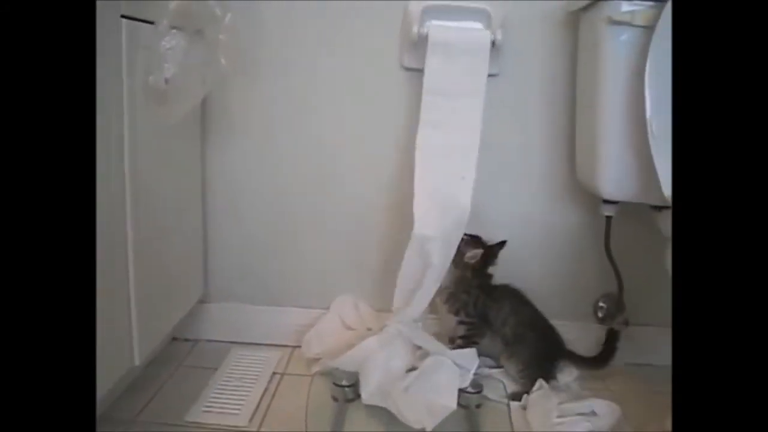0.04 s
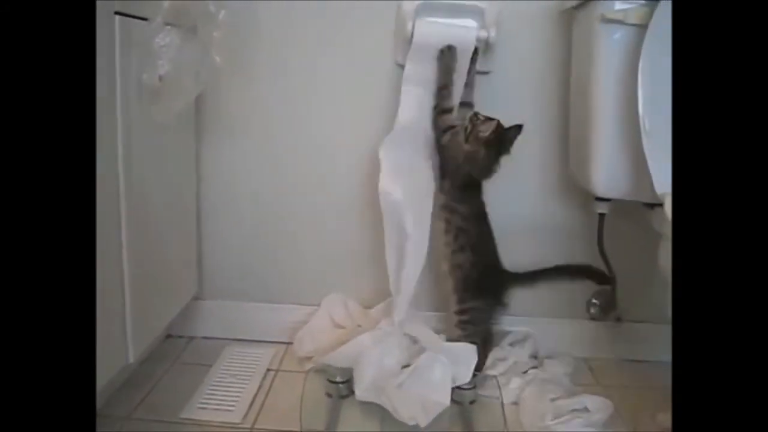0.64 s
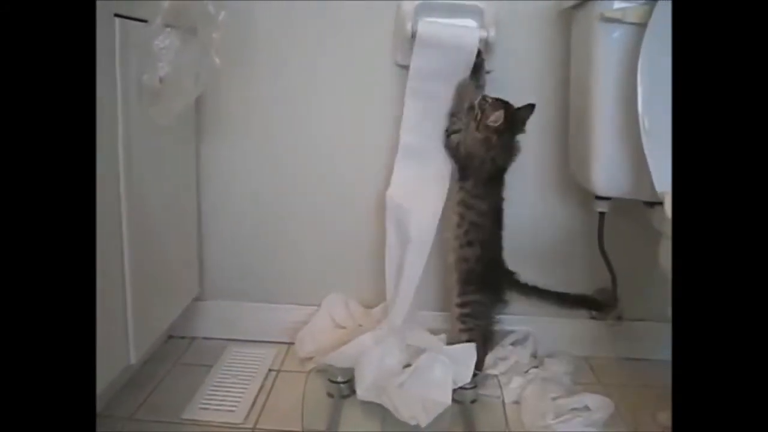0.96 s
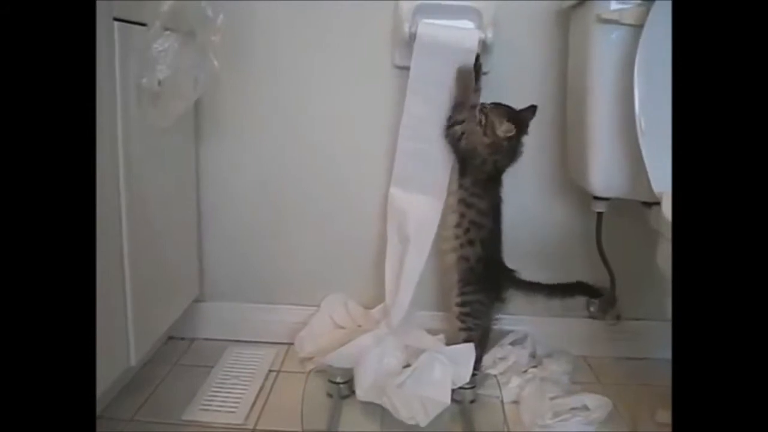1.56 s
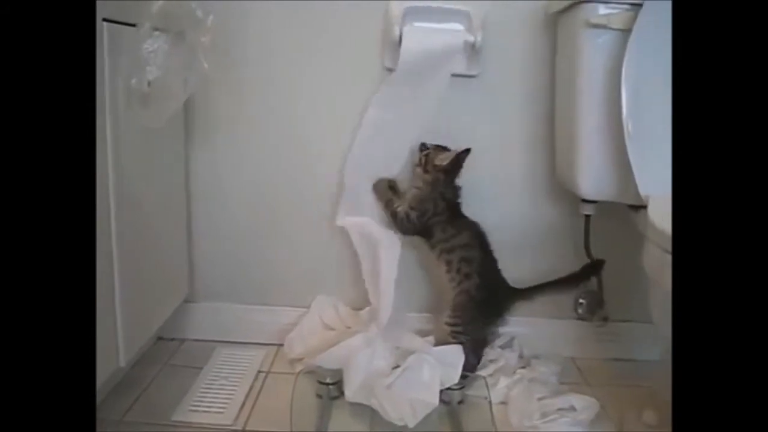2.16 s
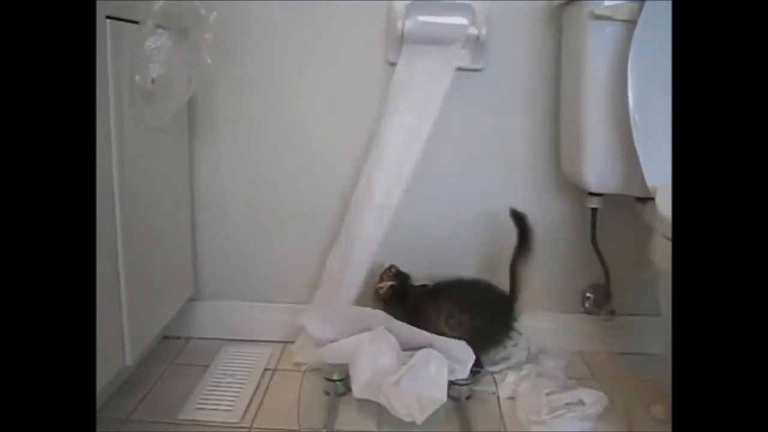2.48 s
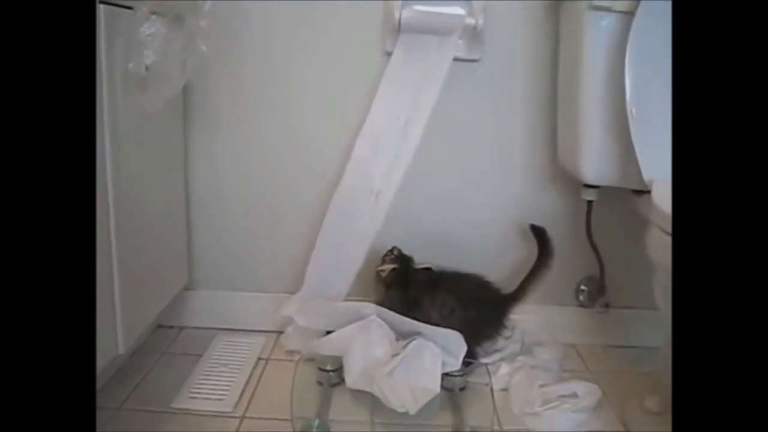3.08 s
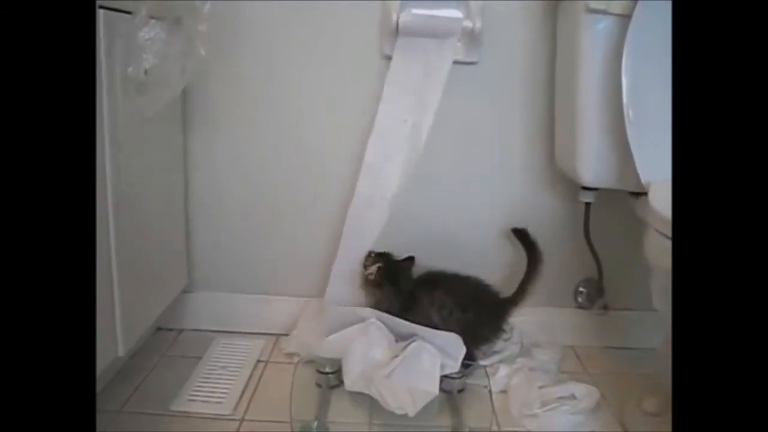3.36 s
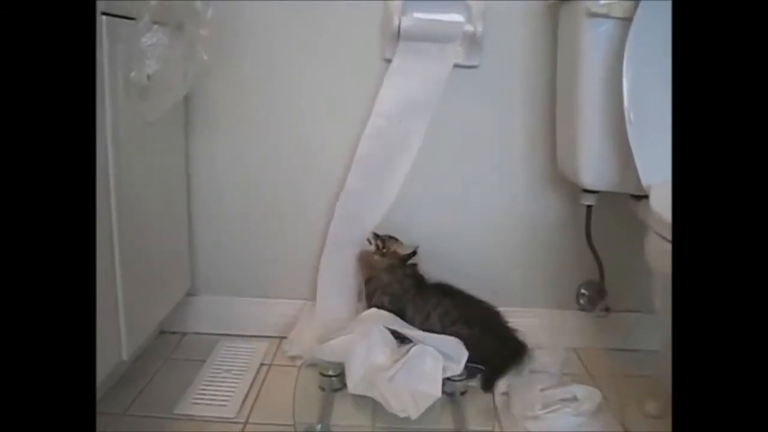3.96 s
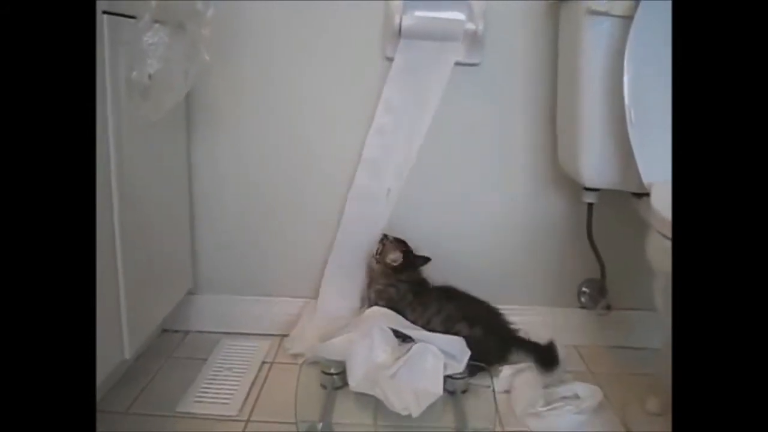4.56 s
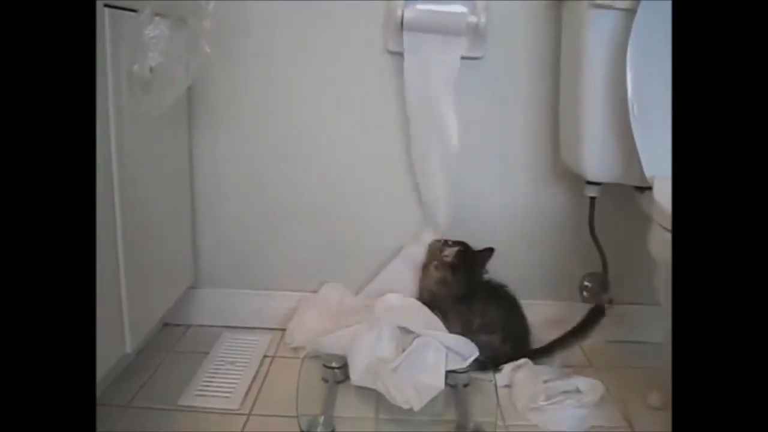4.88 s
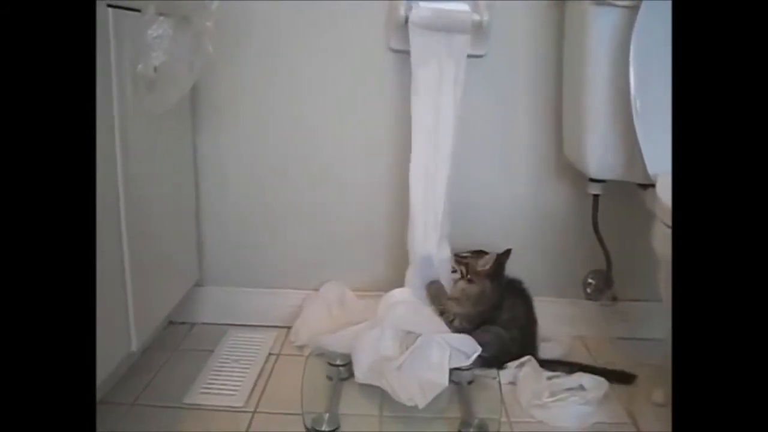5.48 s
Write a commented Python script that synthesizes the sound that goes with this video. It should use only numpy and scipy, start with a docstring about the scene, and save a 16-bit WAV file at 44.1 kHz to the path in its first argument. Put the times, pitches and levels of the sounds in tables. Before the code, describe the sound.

A light rustle of toilet paper is followed by a loud clatter of the spindle as a kitten claws the roll. Scattered ticks, knocks and papery swishes build to another rattling pull, with dull paw landings. The holder then mostly settles, leaving soft rustles and a closing run of sharp crinkles. Everything is heard from within a small, briefly echoing bathroom over faint ventilation noise.

```python
"""Tissue rustles and a spindle knocks and rattles: a kitten claws at a toilet roll, then tugs the strip.
Friction of the turning tube and impacts of the spindle excite the resonances of the holder.
The sliding tissue hisses as its fibres rub and crinkles as it buckles; soft paws thump in the heap
on the floor. A small tiled bathroom reverberates briefly, over faint ventilation and a thin whine."""
import sys
import numpy as np
from scipy import signal
from scipy.fft import rfft, irfft
from scipy.io import wavfile

SR = 44100
rng = np.random.default_rng(int(sys.argv[2]) if len(sys.argv) > 2 else 0)


def to_wav(sig):
    """Store sig (one row per channel, or 1-D mono) as 16-bit WAV at the path in sys.argv[1].

    Samples outside -1..1 are clipped; the rate is SR.
    """
    pcm = np.clip(np.atleast_2d(sig), -1, 1) * 32767
    pcm = np.round(pcm).astype(np.int16)
    wavfile.write(sys.argv[1], SR, pcm.T)  # frames by channels


N = 247842
TIME = np.arange(N) / SR


def undb(db):
    """Decibels to amplitude ratio."""
    return 10 ** (np.asarray(db) / 20)


def unit(x):
    """Normalise to rms 1."""
    return x / np.sqrt(np.mean(x ** 2))


def add(track, start_s, sound):
    """Superpose a sound on the track."""
    start = int(start_s * SR)
    track[start:start + len(sound)] += sound[:N - start]


def bins(size=8192):
    """Frequency grid of a response, in Hz."""
    return np.arange(size // 2 + 1) * SR / size


def on_log_axis(hz, rows):
    """Interpolate (frequency_hz, value) rows along log frequency."""
    points, values = np.transpose(rows)
    return np.interp(np.log(hz + 1), np.log(points), values)


def colour(rows):
    """Magnitude response from (frequency_hz, gain_db) rows."""
    return undb(on_log_axis(bins(), rows))


def hump(centre_hz, reach_octaves):
    """Band-pass magnitude response, symmetric in log frequency."""
    octaves = np.log2((bins() + 1) / centre_hz)
    return 1 / (1 + (octaves / reach_octaves) ** 2) ** 0.91


def ring(force, gain):
    """Forced vibration of a causal, minimum-phase body with this magnitude response."""
    cepstrum = irfft(np.log(gain + 1e-6))
    half = len(cepstrum) // 2
    cepstrum[1:half] *= 2
    cepstrum[half + 1:] = 0
    impulse_response = irfft(np.exp(rfft(cepstrum)))
    return signal.fftconvolve(force, impulse_response)[:len(force)]


def grains(per_s, spread_db):
    """Shot noise: impulses of random size at random moments, rms 1."""
    fires = rng.random(N) < per_s / SR
    impulses = fires * rng.standard_normal(N)
    return unit(impulses * undb(spread_db * np.clip(rng.standard_normal(N), -2, 2)))


def flutter(per_s):
    """Slow random modulation with a spread near 1."""
    step = max(int(SR / per_s), 1)
    return np.interp(np.arange(N) / step, np.arange(N), rng.standard_normal(N))


def chatter(length_s, size=8192):
    """Broadband contact force: a dense rattle that swells and stops, energy 1."""
    age = np.arange(size) / SR / length_s
    envelope = np.sqrt(age) * np.exp(-age ** 3)
    burst = rng.standard_normal(size) * envelope
    for _ in range(2):
        whitened = irfft(np.exp(1j * np.angle(rfft(burst))))
        burst = whitened * np.sqrt(envelope)
    return burst / np.sqrt(np.sum(burst ** 2))


def blow(length_s, gain):
    """Impact excitation: chatter rings a body, with the energy of rms 1 held for length_s."""
    sound = ring(chatter(length_s), gain)
    return sound * np.sqrt(length_s * SR / np.sum(sound ** 2))


def pulls(rows, attack_s, release_s, linger_db, fade_db_per_s):
    """Envelope of driven, then damped motion: pulls take hold, let go and linger; their powers add."""
    power = 0
    for start_s, length_s, level_db, swell_db in rows:
        age = TIME - start_s
        since_release = np.maximum(age - length_s, 0)
        attack = np.sin(np.pi / 2 * np.clip(age / attack_s, 0, 1)) ** 2
        hold = undb(level_db + swell_db * (np.clip(age / length_s, 0, 1) - .5))
        linger = undb(linger_db - fade_db_per_s * since_release)
        release = np.maximum(np.exp(-since_release / release_s), linger)
        power = power + (attack * hold * release) ** 2
    return np.sqrt(power)


def ventilation(level_db=-58):
    """Steady broadband air noise, filtered by two hollow duct resonances."""
    # spectrum of the air noise: frequency_hz, gain_db
    air_spectrum = [(25, -3), (70, -1), (130, -5.5), (180, -3), (245, -2.5), (310, 5.5), (400, -6.5),
                    (790, -6.5), (925, 6), (1080, -4.5), (1500, -11.5), (4000, -14.5), (9000, -19.5),
                    (16000, -27)]
    return undb(level_db) * unit(ring(rng.standard_normal(N), colour(air_spectrum)))


def whine(pitch_hz=7740, waver_hz=25, level_db=-80):
    """A thin background tone wavers by random frequency modulation."""
    hz = pitch_hz + waver_hz * flutter(40)
    return undb(level_db) * unit(np.sin(2 * np.pi * np.cumsum(hz) / SR))


def holder():
    """Modal response of the holder: overlapping resonances add in power."""
    # modes of holder, spindle and cardboard tube: pitch_hz, bandwidth_hz, gain_db
    modes = [(182, 66, -4), (550, 180, 5.5), (974, 390, -1), (1385, 116, 1), (1623, 120, -1.5),
             (1790, 100, -5), (2030, 130, -4.5), (2450, 520, -4.5), (3020, 140, -1), (3990, 430, 0),
             (4540, 190, -7), (4855, 95, 0.5), (5400, 100, -7), (5890, 470, -4), (10160, 2100, -7.5)]
    hz = bins()
    power = 0
    for pitch_hz, bandwidth_hz, gain_db in modes:
        resonance = 1 / (1 + (2 * (hz - pitch_hz) / bandwidth_hz) ** 2)
        bass_rolloff = hz / (hz + pitch_hz)
        power = power + undb(gain_db) ** 2 * resonance * bass_rolloff
    return np.sqrt(power)


def roll(bumps_per_s=5000, wobble_db=1):
    """Roughness excitation: the tube scrapes round the spindle, shakes the holder and coasts to rest."""
    # turns of the roll: start_s, length_s, level_db, swell_db
    turns = [(0, .09, -61.5, 4), (.511, 0.112, -30.5, -0.5), (1.295, 0.02, -55, -8),
             (1.688, 0.029, -33, -1), (2.0, 0.17, -49.5, -2), (2.14, 0.21, -46.5, -6),
             (2.288, 0.044, -39.5, -6), (2.345, 0.052, -29, 4), (2.40, 0.095, -37.5, 1),
             (4.615, 0.054, -52.5, 8), (4.85, 0.95, -55, 1), (5.187, 0.024, -41.5, -13)]
    # spectrum of the scraping: frequency_hz, gain_db
    scrape_spectrum = [(40, 3), (95, 0.5), (160, 6), (260, 0), (600, 0), (850, 1.5), (1600, 1), (2100, 3.5),
                       (3500, -4.5), (5500, -1.5), (9000, -6), (16000, -22)]
    bumps = grains(bumps_per_s, spread_db=2) * undb(wobble_db * flutter(110))
    turning = pulls(turns, attack_s=0.0076, release_s=0.0079, linger_db=-19.5, fade_db_per_s=62)
    return unit(ring(bumps, holder() * colour(scrape_spectrum))) * turning


def contact(centre_hz, reach_octaves):
    """Selective excitation: one contact favours the holder's modes near its centre frequency."""
    return holder() * hump(centre_hz, reach_octaves)


def grates(slips_per_s=3000):
    """Stick-slip friction of the spindle in its sockets keeps a few resonances ringing."""
    # spells of grating: start_s, length_s, level_db, centre_hz, reach_octaves
    spells = [(0.016, 0.072, -58.5, 1470, 0.28), (0.487, 0.015, -31, 4400, 1),
              (0.509, 0.14, -33, 5400, 0.25), (.51, 0.11, -32.5, 1950, 0.21),
              (1.37, 0.035, -47, 4000, 0.19), (1.689, 0.0295, -29.5, 1880, 0.28),
              (1.681, 0.043, -37, 3160, 0.018), (2.004, 0.11, -51, 1387, 0.03),
              (2.152, 0.31, -44, 1398, 0.028), (2.363, 0.057, -30, 1130, 0.3),
              (4.648, 0.34, -55.5, 1790, 0.084), (5.361, 0.24, -53, 3926, 0.012)]
    out = np.zeros(N)
    for start_s, length_s, level_db, centre_hz, reach_octaves in spells:
        size = int(length_s * SR)
        slips = grains(slips_per_s, spread_db=4.5)[:size]
        ringing = unit(ring(slips, contact(centre_hz, reach_octaves)))
        add(out, start_s, undb(level_db) * ringing * signal.windows.tukey(size))
    return out


def tissue(holder_db=3):
    """Mechanical coupling: the taut strip adds the holder's high ring to its own broad response."""
    # spectrum of the strip: frequency_hz, gain_db
    strip_spectrum = [(60, -17), (160, -11.5), (400, -3), (700, -3), (1200, 2), (2200, 0), (3000, 0.5),
                      (4500, -1), (7000, -4.5), (11000, -7.5), (15500, -14.5)]
    return colour(strip_spectrum) * np.hypot(1, undb(holder_db) * contact(4400, 0.14))


def paper(fibres_per_s=9000, folds_per_s=70, fold_db=-6, catch_db=3.5, brisk_db=-45, rest_db=-78):
    """Friction of fibres gives an uneven hiss; buckling folds merge into a swish on brisk pulls."""
    # strokes of the tissue under the claws and over itself: start_s, length_s, level_db, swell_db
    strokes = [(.228, 0.11, -50.5, 0.5), (.32, 0.16, -57, 3), (.60, 0.087, -38, 6.5),
               (.772, 0.036, -38, 10), (.815, 0.091, -33, 0.5), (1.27, 0.049, -51.5, 15),
               (1.40, 0.038, -49.5, 8), (1.558, 0.029, -40.5, 4.5), (1.75, 0.23, -63, 17),
               (1.948, 0.026, -46, 9), (2.18, 0.15, -43, -6.5), (2.29, 0.052, -39.5, 10),
               (2.33, 0.17, -28.5, -2), (2.67, 0.067, -54.5, -3), (3.288, 0.11, -47, 13),
               (3.42, 0.58, -56, -2), (4.12, 0.074, -53, 2), (4.2, 0.27, -61, -2), (4.592, 0.049, -43.5, 6),
               (4.66, 0.32, -49, 3), (5.0, 0.91, -52, 1), (5.16, 0.07, -38, 3.5), (5.29, 0.041, -43.5, -5),
               (5.53, 0.028, -40.5, -5)]
    # crispness, higher in crumpling than in sliding: time_s, treble_gain_db
    crispness = [(.55, 1), (.85, 1.5), (1.57, 2), (2.4, 0), (3.4, -2), (4.6, -2), (5.2, 3)]
    sliding = pulls(strokes, attack_s=0.0085, release_s=0.009, linger_db=-22, fade_db_per_s=40)
    sliding = np.hypot(sliding, undb(rest_db))  # the hanging strip is never quite still
    crowding = 1 + sliding / undb(brisk_db)
    rustle = grains(fibres_per_s, spread_db=1.5) * undb(catch_db * flutter(60))
    for fold_hz in (1300, 2600, 5200, 10400):  # four sizes of fold
        folds = grains(folds_per_s * crowding, spread_db=0.5) / np.sqrt(crowding)
        snap = blow(length_s=.004, gain=hump(fold_hz, reach_octaves=0.56))
        buckles = unit(signal.fftconvolve(folds, snap)[:N])
        band_weight = np.sqrt(fold_hz / 10000)  # higher folds fill wider bands
        rustle = rustle + undb(fold_db) * band_weight * buckles
    rustle = unit(ring(rustle, tissue()))
    treble = signal.sosfiltfilt(signal.butter(2, 8000, "high", fs=SR, output="sos"), rustle)
    treble_gain = undb(np.interp(TIME, *np.transpose(crispness)))
    return (rustle + (treble_gain - 1) * treble) * sliding


def near_wall(reflection=0.78):
    """Comb filtering: a wall echo interferes with the direct sound; its lag varies from spot to spot."""
    lag_s = rng.uniform(.0007, .0016)
    return np.abs(1 + reflection * np.exp(2j * np.pi * bins() * lag_s))


def knocks():
    """Impacts of the spindle ring the holder close to the wall; a harder contact rings higher."""
    # spindle impacts: start_s, level_db, centre_hz, reach_octaves, contact_s
    impacts = [(0.495, -28.5, 5200, 2.3, 0.0044), (0.5061, -15.5, 4270, 2.5, 0.0025),
               (0.5093, -12, 4500, 0.72, 0.0027), (0.5648, -25.5, 1820, 0.51, .004),
               (0.568, -20.5, 4600, 0.7, 0.0023), (0.976, -37, 3340, 0.63, 0.0047),
               (0.9784, -19.5, 5930, 0.52, 0.0044), (1.301, -43.5, 5200, 0.57, 0.0037),
               (1.309, -41.5, 4600, 0.28, .004), (1.399, -43, 4630, 0.59, 0.0056),
               (1.421, -38.5, 5030, 0.47, 0.0035), (1.436, -41, 5400, 0.65, 0.0042),
               (1.541, -41.5, 6060, 0.76, 0.0037), (1.562, -39.5, 7000, 0.95, 0.0045),
               (1.6727, -28.5, 5300, 1.1, 0.0038), (1.6764, -28.5, 7040, 2.2, 0.0055),
               (1.688, -30, 4500, 2.5, .003), (1.6882, -17, 1717, 0.12, 0.0021),
               (1.6982, -19.5, 1890, 0.12, 0.0027), (2.003, -40.5, 4280, 1.0, 0.0028),
               (2.004, -35, 1340, 0.074, 0.0028), (2.019, -43, 3400, 1, 0.0036),
               (2.053, -51, 4500, 0.64, 0.0034), (2.078, -38, 3770, 0.43, 0.0022),
               (2.077, -43.5, 1000, 0.26, .003), (2.14, -32.5, 1310, 0.075, 0.0036),
               (2.147, -39, 1760, 0.067, 0.0035), (2.189, -31.5, 3980, 0.54, 0.0031),
               (2.187, -35, 1400, 0.11, 0.0027), (2.242, -36.5, 1600, 1.3, 0.0034),
               (2.2885, -29, 3260, 1.1, 0.0044), (2.293, -29.5, 1310, 0.14, .004),
               (2.3183, -18, 4460, 0.65, 0.0041), (2.332, -30.5, 1390, 0.093, 0.003),
               (2.3623, -16, 3560, 0.6, 0.0037), (2.376, -34, 2180, 1.3, .004)]
    out = np.zeros(N)
    for start_s, level_db, centre_hz, reach_octaves, contact_s in impacts:
        response = contact(centre_hz, reach_octaves) * near_wall()
        add(out, start_s, undb(level_db) * blow(contact_s, response))
    return out


def paws(contact_s=0.04):
    """Soft impacts: a slow, padded contact carries little treble and gives a dull thump."""
    # landings on the heap and floor: start_s, level_db
    landings = [(1.001, -52.5), (1.70, -46.5), (2.369, -42), (2.46, -44), (4.148, -55), (4.96, -56),
                (5.06, -55), (5.183, -44.5), (5.225, -49), (5.31, -55)]
    # spectrum of a thump: frequency_hz, gain_db
    thump_spectrum = [(40, -24), (95, -8), (125, -20), (160, 10), (200, -2.5), (250, 3), (380, -5.5),
                      (800, -3), (1300, -3.5), (3000, -51)]
    out = np.zeros(N)
    for start_s, level_db in landings:
        add(out, start_s, undb(level_db) * blow(contact_s, colour(thump_spectrum)))
    return out


def creases(snap_s=0.0041, reach_octaves=1.84):
    """Snap-through buckling: big creases give way, each in its own frequency band."""
    # single creases snapping: start_s, level_db, centre_hz
    snaps = [(1.965, -42.5, 5500), (1.974, -45, 4000), (3.687, -49, 4300), (4.095, -54, 9000),
             (4.155, -39.5, 1190), (4.5917, -42, 3500), (4.606, -34.5, 2960), (4.624, -30.5, 3080),
             (4.886, -40.5, 2200), (4.994, -40, 3500), (5.0849, -34, 5850), (5.11, -36, 5000),
             (5.158, -33, 5000), (5.305, -34.5, 6040), (5.321, -34, 4500), (5.377, -37.5, 5000),
             (5.399, -45, 4500), (5.431, -39, 4000), (5.459, -33.5, 4920), (5.472, -46, 4200),
             (5.502, -33.5, 5500), (5.521, -38, 8000), (5.535, -29.5, 4480), (5.554, -35, 4700)]
    out = np.zeros(N)
    for start_s, level_db, centre_hz in snaps:
        response = tissue() * hump(centre_hz, reach_octaves) * near_wall()
        add(out, start_s, undb(level_db) * blow(snap_s, response))
    return out


def bathroom(sound, first_echo_s=0.0018, size=32768):
    """Diffuse reverberation: dense echoes off the tiles decay exponentially, the bass most slowly."""
    # reverberation times: frequency_hz, t60_s
    decay_times = [(150, 0.94), (500, 0.51), (1800, 0.42), (5000, 0.37), (10000, 0.27), (16000, 0.44)]
    t = np.arange(size) / SR
    noise_spectrum = rfft(rng.standard_normal(size))
    tail = 0
    for centre_hz, t60_s in decay_times:
        band = on_log_axis(bins(size), [(hz, float(hz == centre_hz)) for hz, _ in decay_times])
        tail = tail + irfft(noise_spectrum * band) * np.exp(-np.log(1000) * t / t60_s)
    tail = tail * (t > first_echo_s)
    return signal.fftconvolve(sound, tail / np.sqrt(np.sum(tail ** 2)))[:N]


def scene(room_db=-4, direct_db=-3):
    """Direct and reverberant sound superpose; the knocks have the largest direct share."""
    knocking = knocks()
    out = knocking + undb(room_db) * bathroom(knocking) + ventilation() + whine()
    for source in (roll(), grates(), paper(), creases() + paws()):
        out = out + undb(direct_db) * source + undb(room_db) * bathroom(source)
    return out[None]


def record(dry):
    """Band limiting: a steep low-pass filter cuts the highest treble."""
    cutoff_hz = 15900
    return signal.sosfilt(signal.ellip(10, .2, 70, cutoff_hz, fs=SR, output="sos"), dry)


dry = scene()
out = record(dry)
to_wav(out)
```